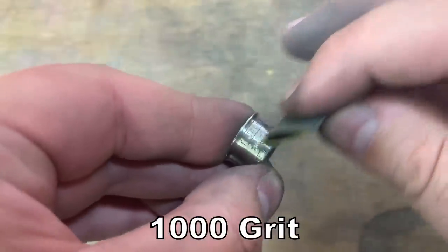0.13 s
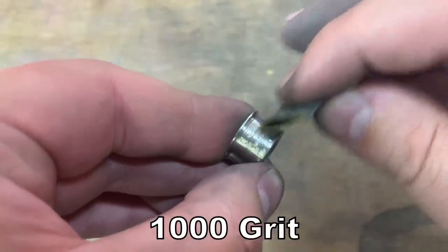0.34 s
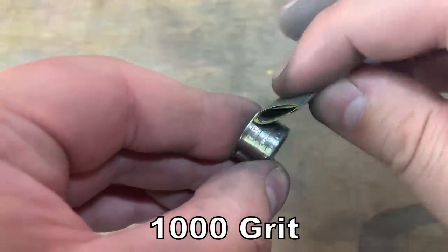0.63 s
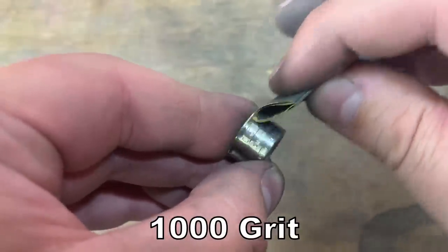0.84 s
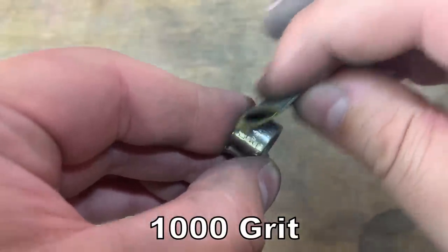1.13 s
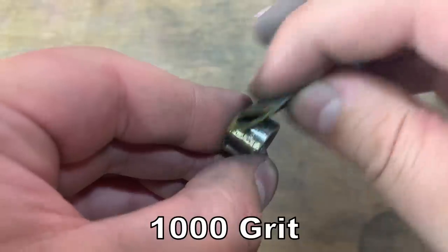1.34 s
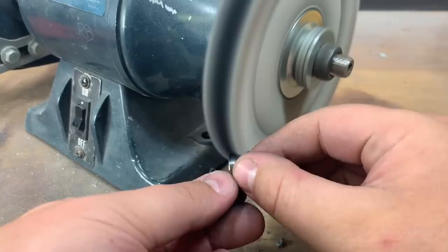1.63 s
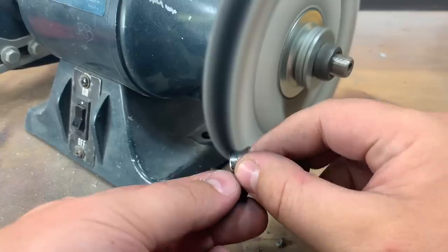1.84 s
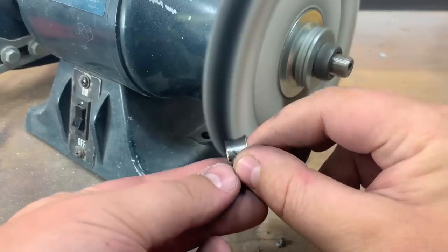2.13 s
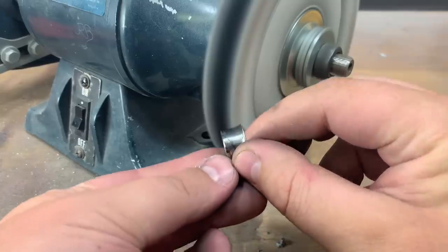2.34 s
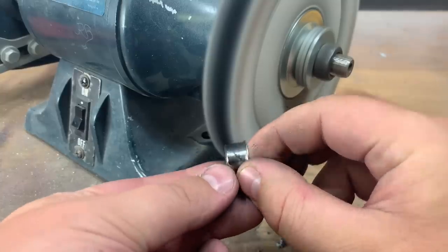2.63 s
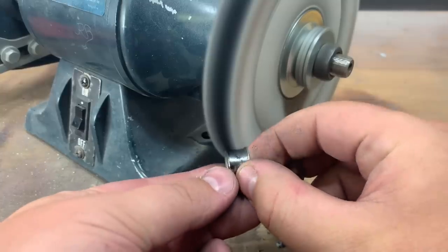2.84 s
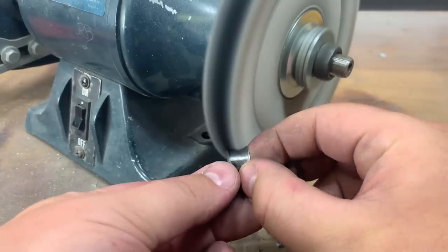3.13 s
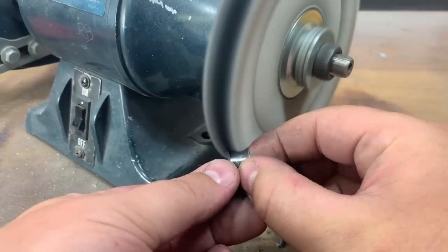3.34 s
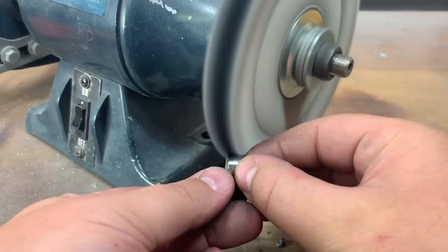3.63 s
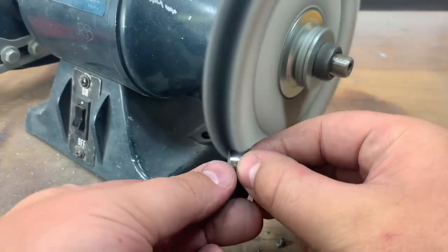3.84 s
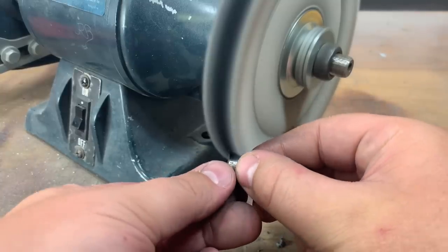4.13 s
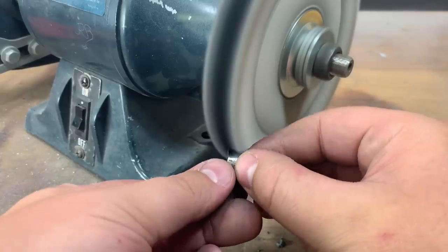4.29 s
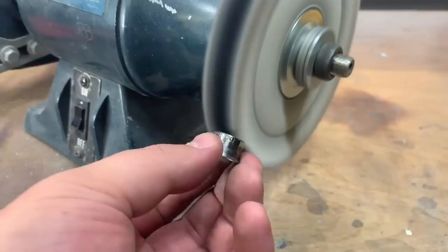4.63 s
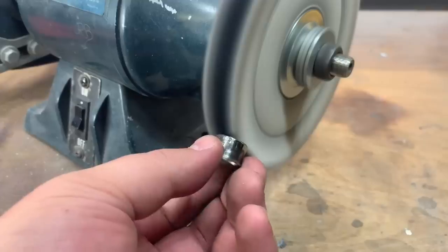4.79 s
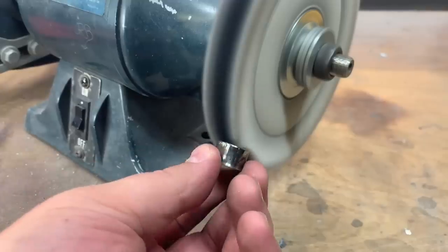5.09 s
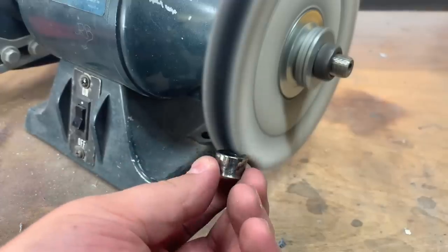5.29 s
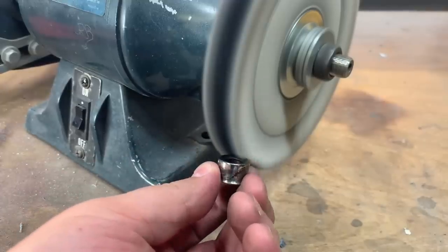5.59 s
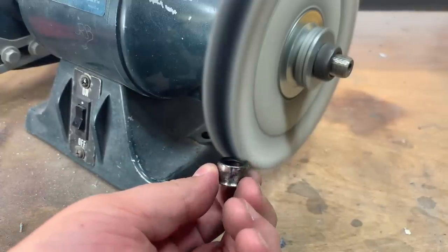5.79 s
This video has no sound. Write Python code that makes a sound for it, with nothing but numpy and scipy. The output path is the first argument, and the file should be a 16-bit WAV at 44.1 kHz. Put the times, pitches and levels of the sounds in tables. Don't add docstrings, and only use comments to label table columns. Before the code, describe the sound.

Close stereo microphones in a workshop. A small metal ring is rubbed by hand with fine sandpaper, about nine crisp, hissy strokes a second, over faint low bench thuds. A hard cut brings a much louder bench grinder: steady deep hum with the ring pressed to its cloth wheel, a rough buzzing hiss that dips, swells and nearly lifts. Another cut gives a brighter, harsher polishing buzz that slowly eases.

```python
import sys
import numpy as np
from scipy import signal
from scipy.fft import rfft, irfft, next_fast_len
from scipy.io import wavfile
from scipy.ndimage import uniform_filter1d, map_coordinates

SR = 44100
rng = np.random.default_rng(int(sys.argv[2]) if len(sys.argv) > 2 else 0)


def volts_from_db(level):
    exponent = np.asarray(level, float) / 20
    return 10 ** exponent


def generate_wav(sig):
    pcm = np.round(np.clip(np.atleast_2d(sig).T, -1, 1) * 32767).astype(np.int16)
    wavfile.write(sys.argv[1], SR, pcm)


N = 262395
POLISH_S, SECOND_POLISH_S = 1.538, 4.624

# time_s, pressure_db, brightening_db
FIRST_PRESS = [
    (1.54, -49.5, 2),
    (1.55, -46, 2),
    (1.65, -43, 2.8),
    (2.11, -40.5, 2),
    (2.3, -42.5, 3.4),
    (2.52, -50.5, 1.4),
    (3.11, -43, 0.52),
    (4.2, -40, 0.1),
    (4.5, -42.5, 0.35),
    (4.62, -52.5, 0.1),
]
SECOND_PRESS = [
    (4.631, -43, -1.3),
    (4.84, -43, 1),
    (4.99, -43, -1.3),
    (5.2, -44, 0.7),
    (5.42, -44.5, 0.4),
    (5.6, -45, -1.5),
    (5.76, -46, 0.27),
    (5.88, -47, -1.7),
]
# frequency_hz, density_db (per Hz)
FIRST_COLOUR = [(250, 3.5), (450, -5), (950, -2), (1500, -5), (2200, -0.5), (3000, -1), (4000, 0.2),
                (5700, 1), (7300, 3.5), (9500, -0.5), (12700, -0.5), (14500, -2.5), (15600, -6.5)]
SECOND_COLOUR = [(250, 6.5), (500, -8), (900, -4.5), (1400, 0), (2300, 0), (3500, 0), (5000, 2), (6700, 2),
                 (7500, 2), (9200, 5), (10000, 1.5), (14900, 4.5), (15350, -12), (15700, 1.5)]
# frequency_hz, width_hz, gain_db
FIRST_RESONANCES = [(980, 88, 3.5), (1296, 54, 3.5), (1825, 94, 5.5), (2170, 64, 2), (3020, 230, 5.5),
                    (3430, 64, 3), (4590, 23, -1), (5030, 110, 0.5), (5680, 170, 3.5), (5800, 76, -2.5),
                    (9170, 590, 1.5), (12900, 880, 3)]
SECOND_RESONANCES = [(1390, 27, 2.8), (1507, 60, 4.4), (2690, 140, 3.2), (2930, 88, 6.8), (3547, 140, 8.2),
                     (4120, 99, 3), (4360, 61, 3.5), (5580, 150, 2.6), (6220, 100, 4.3), (6540, 110, 4.7),
                     (6780, 420, 3.7), (7900, 550, 2.5), (9330, 150, 2.8), (9100, 320, 3.9)]
# order (multiple of the turn rate), first_polish_db, second_polish_db
ROTOR_TONES = [(1, -31.5, -32), (2, -44.5, -47.5), (2.629, -49.5, -51.5), (3.005, -52, -51),
               (4.014, -52.5, -59.5), (4.996, -63, -66), (5.976, -62.5, -67), (16.04, -59.5, -74),
               (22.92, -61.5, -53.5), (27, -59.5, -60), (31.1, -69, -66), (33, -65.5, -64),
               (36, -64.5, -63), (51, -88, -65)]
# frequency_hz, first_polish_db, second_polish_db
MAINS_TONES = [(120.7, -54, -46.5), (240.8, -54, -56.5), (348, -67, -68), (479.8, -57.5, -44.5),
               (540, -57.5, -52.5), (599.6, -56, -54.5)]
# frequency_hz, density_db (per Hz)
MOTOR_RUMBLE = [(25, -37), (42, -3.5), (65, -11.5), (178, -10.5), (287, -22), (474, -15.5), (534, -17),
                (602, -20), (830, -15), (2400, -31), (3200, -50)]
MOTOR_DB = -50.5
FULL_DB = -40
FREE_TURNS_PER_S, SAG_TURNS_PER_S, INERTIA_S = 59.58, 0.9, 0.2
LOW_DB, MIDDLE_DB, TOP_DB = (-37, -37), (-43.5, -33), (-37, -34.5)
MIDDLE_FOLLOWS, TOP_FOLLOWS = 0.91, 0.83
REPEATS, REPEATS_PER_DB = (0.82, 0.95), 0.04

# start_s, end_s, scratch_db, top_db (above scratch)
STROKE_TIMES = [(-0.04, 0.041, -51.5, -1), (0.06, 0.143, -48.5, 0), (0.157, 0.261, -49.5, -2.5),
                (0.283, 0.37, -48, -1.5), (0.393, 0.477, -46.5, -4.5), (0.491, 0.583, -48.5, -0.5),
                (0.612, 0.69, -50, 0.5), (0.721, 0.805, -53.5, 5), (0.828, 0.907, -51, 2.5),
                (0.944, 1.032, -53.5, 4.5), (1.057, 1.135, -47.5, 0.5), (1.169, 1.245, -53, 5.5),
                (1.272, 1.355, -48, -2.5), (1.391, 1.475, -49.5, 1), (1.502, 1.59, -53, 0)]
# frequency_hz, density_db (per Hz)
PAPER_SPECTRUM = [(250, -13), (700, -16.5), (1700, -15), (2400, -7.5), (3200, -2), (5500, -4.5), (8000, 0),
                  (11000, -2.5), (15500, -2.5)]
# frequency_hz, width_hz, gain_db
RING_RESONANCES = [(3130, 220, 5.5), (4170, 180, 4.5), (4770, 220, 0.5), (5900, 480, 2.5), (7440, 370, 6.5),
                   (7850, 820, -0.5), (8970, 520, 10.5), (9970, 400, 7.5), (10630, 570, 9),
                   (12340, 600, 11), (13900, 420, 6), (15500, 590, 9.5)]
RASP_DB, RASP_FOLLOWS = -52.5, 0.1
ATTACK_S, CREST_AT = (0.0052, 0.002), (0.6, 0.17)
ONSET_DB, FADE_DB, DULLING_DB = (-5.5, 1.5), (-0.5, -5), (-2.5, -5.5)
SLOWING_S, STOP_DB = (0.015, 0.0069), (-7, -2.5)
LIFT_S, LIFT_DB, HUSH_DB = 0.0076, -22.5, (-29, -21)

# time_s, half_length_s, level_db
BENCH_ROCKS = [
    (0.03, 0.026, -59),
    (0.19, 0.068, -61),
    (0.43, 0.091, -57),
    (0.673, 0.055, -53.5),
    (0.908, 0.064, -53),
    (1.09, .04, -63),
    (1.21, 0.04, -53.5),
    (1.393, 0.032, -50.5),
    (1.5, 0.063, -55),
]
# frequency_hz, density_db (per Hz)
ROOM_RUMBLE = [(15, -45), (39, -7), (58, 7.5), (82, -5), (118, -2), (200, -17.5), (400, -27), (1000, -33),
               (2000, -37.5), (4000, -33), (9000, -65), (16000, -62)]
ROOM_DB = -62.5

# frequency_hz, lead_rad
PORT_LEADS = [
    [(0, 0), (1980, 1.5), (2670, 1.0), (3530, 1.5), (4100, 0), (4520, -3.1), (4950, -6.5), (5350, -9.4),
     (5940, -11.5), (7490, -12.9), (8650, -15.71)],
    [(0, 0), (600, .8), (950, .5), (2200, 1.5), (2430, 2.9), (2720, 3.2), (3010, 2.1), (3350, 2.2),
     (3790, 4.6), (5600, 4.3), (6460, 0), (7920, -1.3), (8650, -3.14)],
    [(0, 0), (1640, .7), (2100, 1.6), (2400, 2.9), (2800, 3.3), (3450, 6.2), (4200, 6.5), (5000, 8.8),
     (6200, 8.2), (7060, 7.1), (7410, 5.2), (8650, 3.14)],
]
# frequency_hz, left_over_right_db
PORT_BALANCE = [
    [(60, -2.5), (110, -2.0), (200, 0.0), (380, 0.0), (700, 2.5), (1290, 4.5), (2380, 1.5), (4400, -1.0),
     (8120, 0.5), (15000, 0.0)],
    [(60, 0.5), (110, -1.0), (200, -0.5), (380, 0.0), (700, 2.5), (1290, 2.5), (2380, 0.5), (4400, 0.0),
     (8120, 0.0), (15000, 0.0)],
    [(60, 0.5), (110, -0.5), (200, -1.0), (380, 1.5), (700, 2.0), (1290, 4.5), (2380, 2.0), (4400, -2.5),
     (8120, 0.0), (15000, 0.0)],
]
# frequency_hz, stray_db (against the shared part)
STRAY_PATHS = [
    [(250, -3), (1700, -2.5), (3000, -8), (4000, -19), (4600, -8), (4900, -12), (5300, 0), (6000, -9),
     (6700, -11), (7300, 3.5), (8000, -1), (9500, -24)],
    [(250, -9), (700, 4.5), (1500, -19), (2200, -9.5), (2550, -6), (3000, -8.5), (3550, -5), (5300, -0.5),
     (7000, -13), (8100, 0), (8600, -21), (9500, -40)],
    [(250, -14), (700, 6), (1700, -9), (2650, -8), (3200, -4), (3800, -10), (5300, 0.5), (6600, -10),
     (7300, -12), (8500, -21), (9500, -57)],
]
TOP_TURN_HZ, CUTOFF_HZ = 3200, 15720


def polishing(t, shot, press, colour, resonances):
    time_s, pressure_db, brightening_db = np.transpose(press)
    eased_db = np.interp(t, time_s, pressure_db) - FULL_DB
    bright_db = np.interp(t, time_s, brightening_db)
    low = LOW_DB[shot - 1] + eased_db
    middle = MIDDLE_DB[shot - 1] + MIDDLE_FOLLOWS * eased_db + bright_db
    top = TOP_DB[shot - 1] + TOP_FOLLOWS * eased_db + bright_db
    repeats = np.clip(REPEATS[shot - 1] + REPEATS_PER_DB * eased_db, 0, 1)
    turns = np.cumsum(wheel_speed(eased_db) + 0.0298 * drift(5.4, t)) / SR
    shared = contact(t, turns, repeats, colour, resonances)
    stray = contact(t, turns, repeats, colour, resonances)
    levels_db = np.array([low, middle, top]) + 2.5
    buzz = ports(shared, stray, t, shot, levels_db, patchy_db=0.8, rate=2.0)
    return buzz + rotor(t, turns, shot) + mains(t, shot) + motor(t)


def contact(t, turns, repeats, colour, resonances):
    throb = volts_from_db(0.14 * np.cos(2 * np.pi * turns) + 0.66 * np.cos(4 * np.pi * turns + 1.2))

    def buzz_db(hz):
        return 1.55 * resonances_db(resonances, hz) - 3 * hz / 10000 - 4 * np.exp(-hz / 1200)

    def hiss_db(hz):
        return resonances_db(resonances, hz) + 3 * hz / 10000

    buzz = coloured(weave(turns, memory=41.5), buzz_db)
    hiss = coloured(grit(t, per_s=20000, spread_db=1.5), hiss_db)
    mixed = np.sqrt(repeats) * buzz + np.sqrt(1 - repeats) * hiss
    return coloured(throb * mixed, lambda hz: at_hz(colour, hz))


def weave(turns, memory):
    count, orders, cells = int(turns[-1]) + 3, 290, 2048
    shape = (count + 60, orders)
    fresh = rng.standard_normal(shape) + 1j * rng.standard_normal(shape)
    worn = signal.lfilter([1], [1, -np.exp(-1 / memory)], fresh, axis=0)[60:]
    worn = worn * volts_from_db(3.35 * rng.standard_normal(orders))
    worn[:, :9] = 0
    surface = irfft(worn, cells, axis=1)
    surface = np.c_[surface, surface[:, :1]]
    return rms_one(map_coordinates(surface, [turns, turns % 1 * cells], order=1))


def wheel_speed(eased_db):
    load, r = volts_from_db(2 * eased_db), np.exp(-1 / (INERTIA_S * SR))
    lagged, _ = signal.lfilter([1 - r], [1, -r], load, zi=[r * load[0]])
    return FREE_TURNS_PER_S - SAG_TURNS_PER_S * lagged


def sanding(t):
    start, end, scratch_db, top_db = np.transpose(STROKE_TIMES)
    by_direction = np.array([ATTACK_S, CREST_AT, ONSET_DB, FADE_DB, DULLING_DB, SLOWING_S, STOP_DB, HUSH_DB])
    attack, crest, onset, fade, dulling, slowing, stop, hush = by_direction[:, np.arange(len(start)) % 2]
    knots_s = np.ravel([start - 0.001, start + attack, start + crest * (end - start),
                        end - slowing, end, end + LIFT_S], "F")

    def along(*knots_db):
        rows = np.broadcast_arrays(start, *knots_db)[1:]
        return np.interp(t, knots_s, np.ravel(rows, "F"))

    def catch():
        grains = grit(t, per_s=18000, spread_db=2.0)
        return coloured(grains, lambda hz: at_hz(PAPER_SPECTRUM, hz) + resonances_db(RING_RESONANCES, hz))

    moving = along(hush, 0, 0, 0, stop, LIFT_DB)
    swell = along(onset, onset, 0, fade, fade, fade)
    scratch = along(*[scratch_db] * 6) + swell
    top = along(*[top_db - dulling / 2] * 3, *[top_db + dulling / 2] * 3)
    levels_db = np.array([RASP_DB + RASP_FOLLOWS * swell, scratch, scratch + top])
    levels_db = levels_db + moving + 1.5 * drift(49, t)
    return ports(catch(), catch(), t, 0, levels_db, patchy_db=3.0, rate=19)


def grit(t, per_s, spread_db):
    sizes = volts_from_db(spread_db * np.minimum(rng.exponential(1, len(t)), 4))
    sizes = sizes * rng.choice([-1, 1], len(t))
    return rms_one(sizes * (rng.random(len(t)) < per_s / SR))


def rotor(t, turns, shot):
    tones = 0
    for row in ROTOR_TONES:
        wander_db = 0.3 if row[0] < 1.5 else 1.5
        tones = tones + tone(row[0] * turns, row[shot] + wander_db * drift(1.86, t), lead=0.25)
    return tones * volts_from_db([[0.15], [-0.15]])


def mains(t, shot):
    return sum(tone(row[0] * t, row[shot] + 2.65 * drift(2.26, t), lead=0.49) for row in MAINS_TONES)


def tone(cycles, level_db, lead):
    phase = 2 * np.pi * (cycles + rng.random()) + lead * np.array([[0.5], [-0.5]])
    return volts_from_db(level_db + 3.5) * np.sin(phase)


def motor(t):
    return volts_from_db(MOTOR_DB) * rumble(t, MOTOR_RUMBLE, side=0.3)


def bench(t):
    rock = coloured(rng.standard_normal(len(t)), lambda hz: -20 * np.log10(1 + ((hz - 57) / 5) ** 2))
    level = np.sqrt(uniform_filter1d(rock ** 2, size=2400))
    steadied = rock / (level + 0.17)
    swells = sum(volts_from_db(db + 3.5) * np.exp(-((t - s) / half) ** 2) for s, half, db in BENCH_ROCKS)
    return swells * steadied + volts_from_db(ROOM_DB) * rumble(t, ROOM_RUMBLE, side=0.25)


def rumble(t, spectrum, side):
    noise = rng.standard_normal((2, len(t))) * [[1], [side]]
    common, opposed = coloured(noise, lambda hz: at_hz(spectrum, hz))
    return common + opposed * [[1], [-1]]


def ports(shared, stray, t, shot, levels_db, patchy_db, rate):
    size = next_fast_len(len(t))
    hz = np.fft.rfftfreq(size, 1 / SR)
    beyond_hz = np.maximum(hz - PORT_LEADS[shot][-1][0], 0)
    lead = np.interp(hz, *np.transpose(PORT_LEADS[shot])) - 2 * np.pi * beyond_hz / TOP_TURN_HZ
    lean = volts_from_db(at_hz(PORT_BALANCE[shot], hz) / 2)
    loose = volts_from_db(at_hz(STRAY_PATHS[shot], hz))
    pair = rfft(shared, size) + loose * rfft(stray, size) * [[1], [-1]]
    pair = pair / np.sqrt(1 + loose ** 2)
    pair = pair * [lean, np.exp(-1j * lead) / lean]
    centres = np.linspace(14, 130, num=28) ** 2
    widths = np.sqrt([3500, 4000, 6500])
    out = 0
    for k, centre in enumerate(centres):
        window = np.interp(hz, centres, np.arange(len(centres)) == k)
        band = irfft(window * pair, size)[:, :len(t)]
        place = np.interp(np.log(centre), np.log([3500, 6800, 10500]), [0, 1, 2])
        shares = np.clip(1 - abs(place - np.arange(3)), 0, 1)
        flicker_db = patchy_db * drift(rate, t)
        out = out + band * volts_from_db(shares @ levels_db + flicker_db) / (shares @ widths)
    return out * np.sqrt(CUTOFF_HZ)


def resonances_db(modes, hz):
    return sum(db / (1 + ((hz - f) / width * 2) ** 2) for f, width, db in modes)


def coloured(x, db_at_hz):
    size = next_fast_len(x.shape[-1])
    gain = volts_from_db(db_at_hz(np.fft.rfftfreq(size, 1 / SR)))
    return rms_one(irfft(rfft(x, size) * gain, size)[..., :x.shape[-1]])


def at_hz(points, hz):
    f, db = np.transpose(points)
    return np.interp(np.log(hz + 1), np.log(f + 1), db)


def drift(rate, t):
    r = np.exp(-80 * np.pi * rate / SR)
    noise = rng.standard_normal(len(t) // 40 + 2002)
    slow = rms_one(signal.lfilter([1], [1, -2 * r, r * r], noise)[2000:])
    return np.interp(np.arange(len(t)) / 40, np.arange(len(slow)), slow)


def rms_one(x):
    return x / np.sqrt(np.mean(np.abs(x) ** 2) + 1e-20)


def scene():
    sand_t, first_t, second_t = np.split(np.arange(N) / SR, [round(POLISH_S * SR), round(SECOND_POLISH_S * SR)])
    return np.hstack([sanding(sand_t) + bench(sand_t),
                      polishing(first_t, 1, FIRST_PRESS, FIRST_COLOUR, FIRST_RESONANCES),
                      polishing(second_t, 2, SECOND_PRESS, SECOND_COLOUR, SECOND_RESONANCES)])


def top_cut(x):
    return signal.sosfilt(signal.butter(12, 16480, fs=SR, output="sos"), x)


def record(dry):
    high_pass = signal.butter(2, 38, "high", fs=SR, output="sos")
    low_pass = signal.ellip(12, 0.5, 70, CUTOFF_HZ, fs=SR, output="sos")
    mix = signal.sosfilt(low_pass, signal.sosfilt(high_pass, dry))
    return top_cut(mix)


dry = scene()
out = record(dry)
generate_wav(out)
```